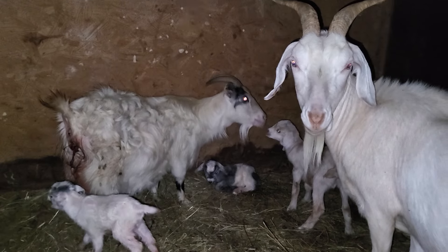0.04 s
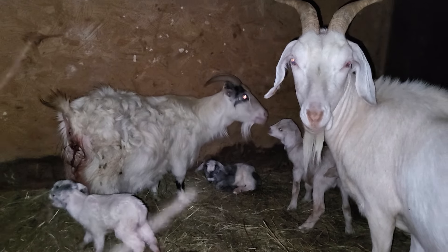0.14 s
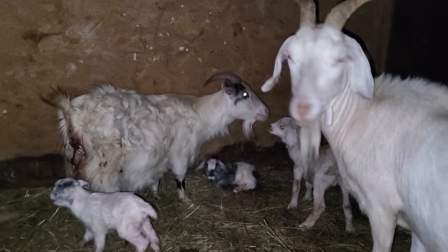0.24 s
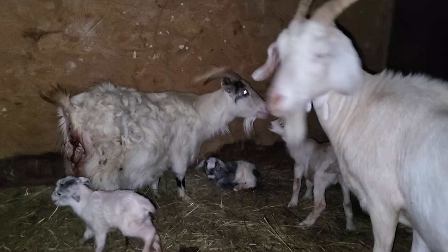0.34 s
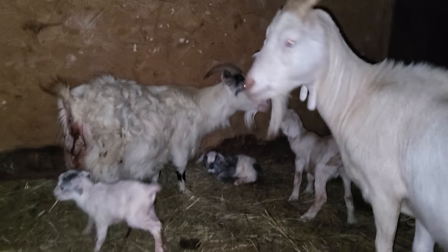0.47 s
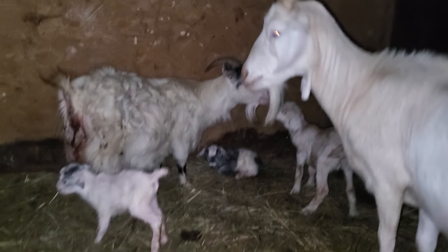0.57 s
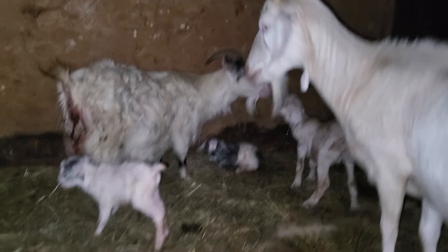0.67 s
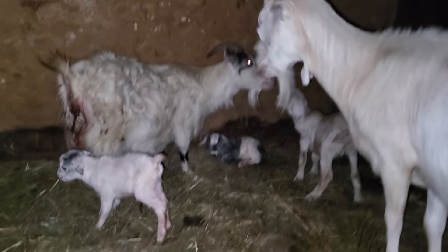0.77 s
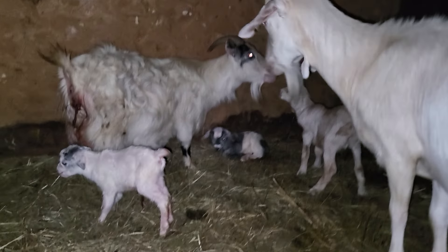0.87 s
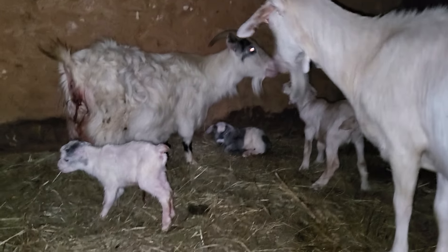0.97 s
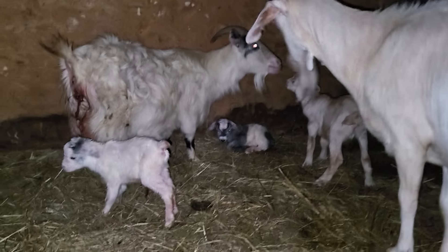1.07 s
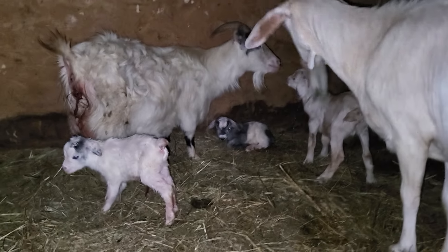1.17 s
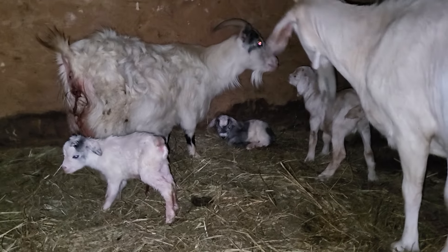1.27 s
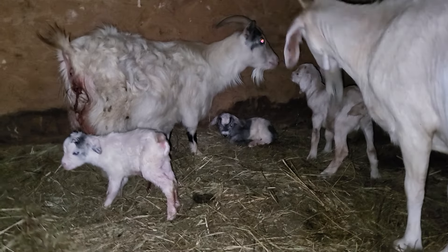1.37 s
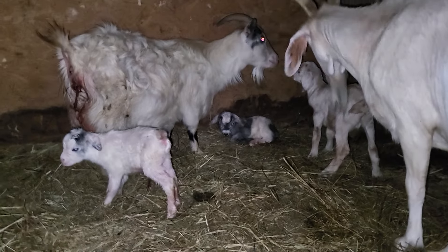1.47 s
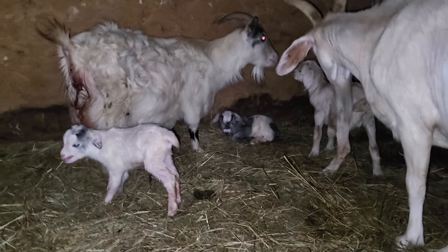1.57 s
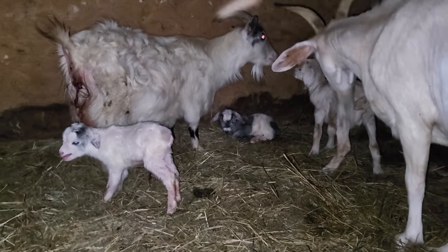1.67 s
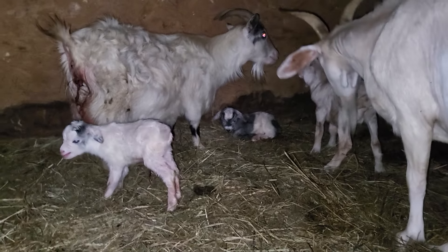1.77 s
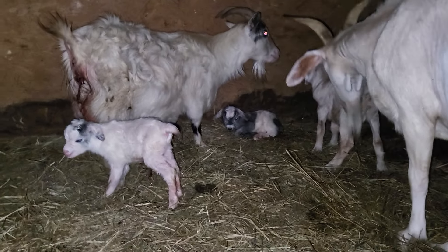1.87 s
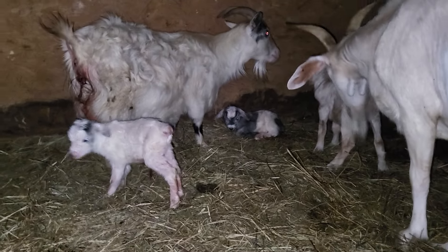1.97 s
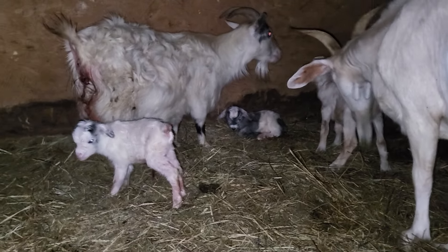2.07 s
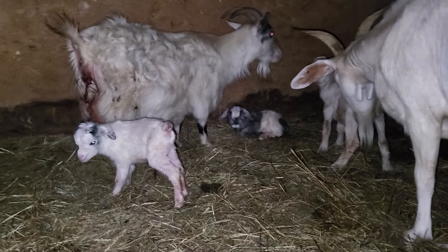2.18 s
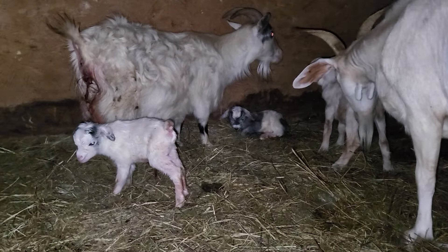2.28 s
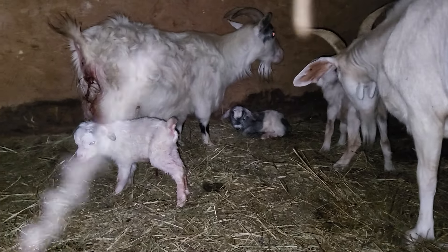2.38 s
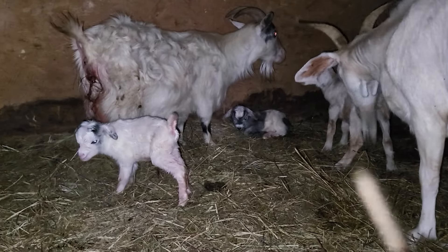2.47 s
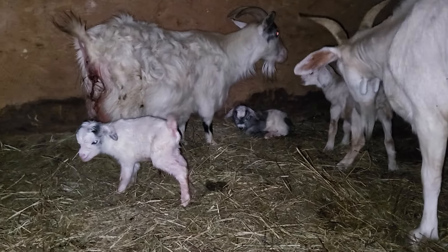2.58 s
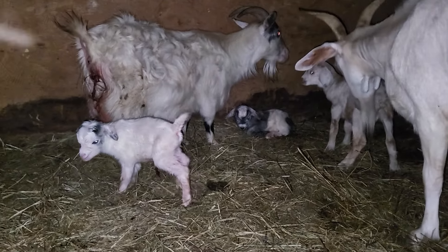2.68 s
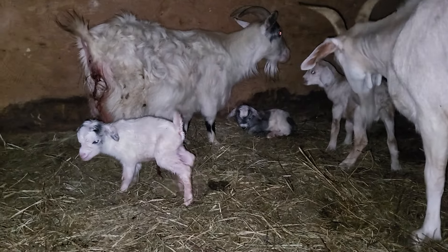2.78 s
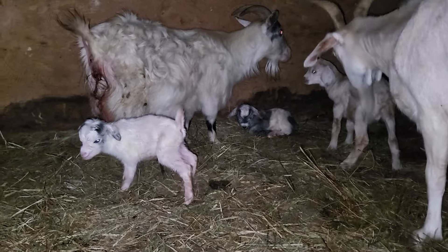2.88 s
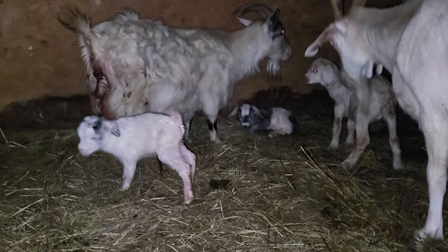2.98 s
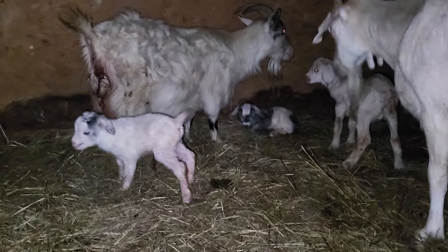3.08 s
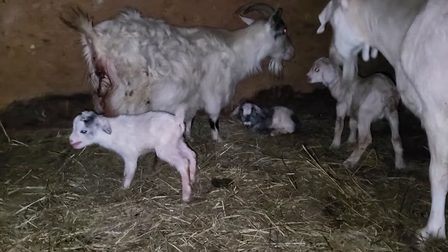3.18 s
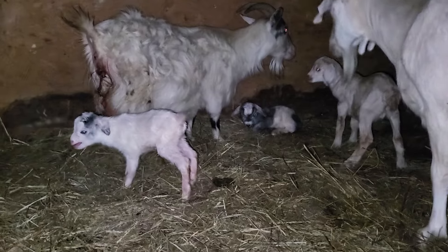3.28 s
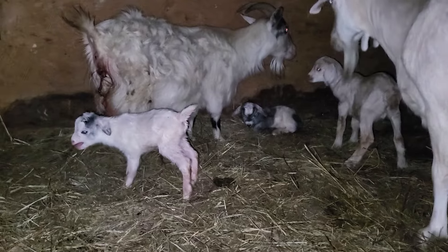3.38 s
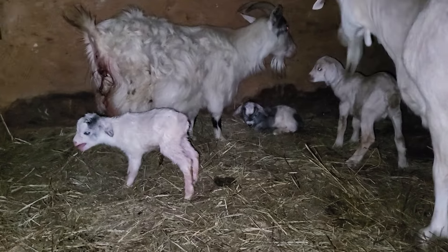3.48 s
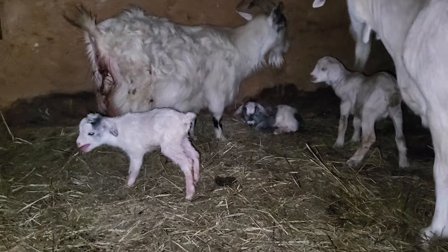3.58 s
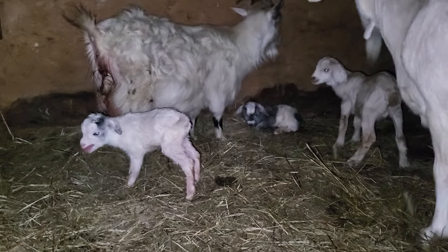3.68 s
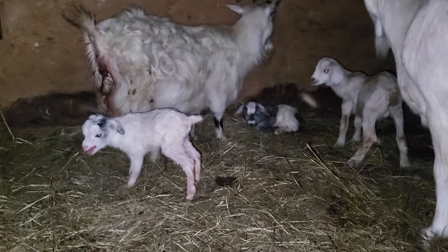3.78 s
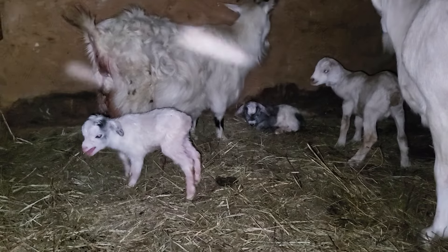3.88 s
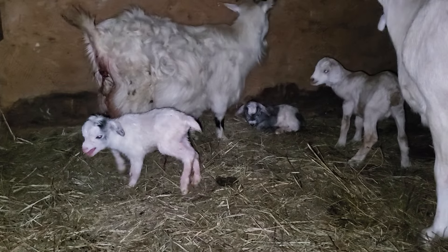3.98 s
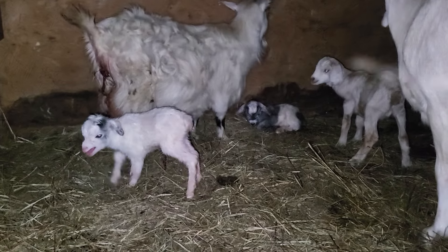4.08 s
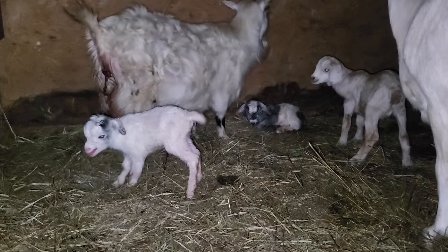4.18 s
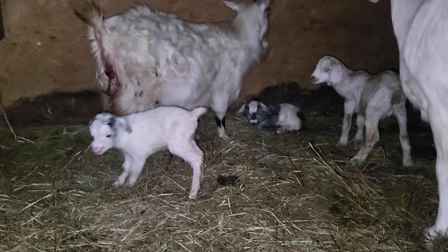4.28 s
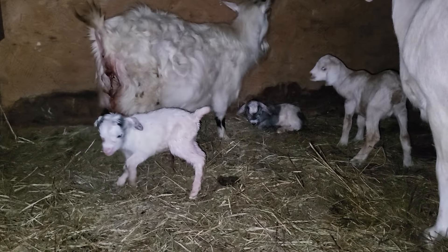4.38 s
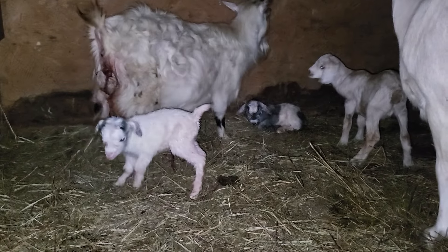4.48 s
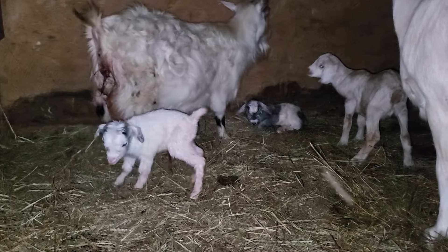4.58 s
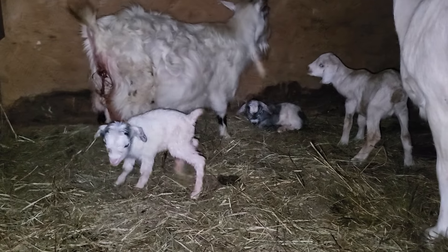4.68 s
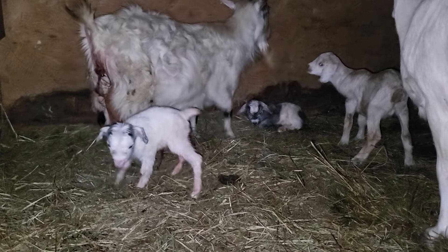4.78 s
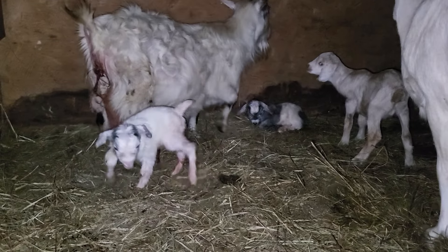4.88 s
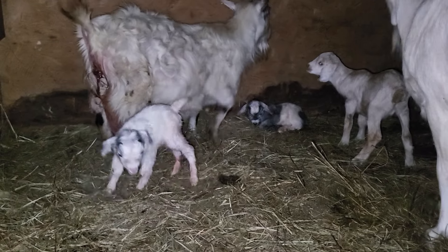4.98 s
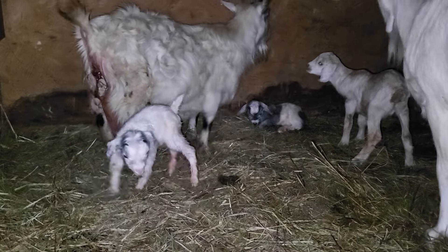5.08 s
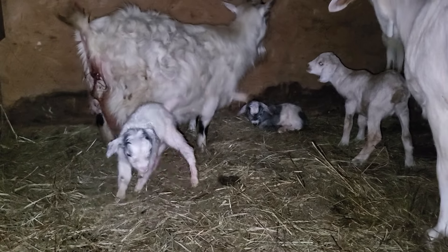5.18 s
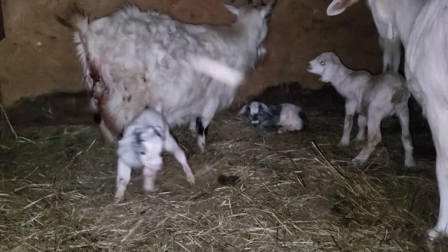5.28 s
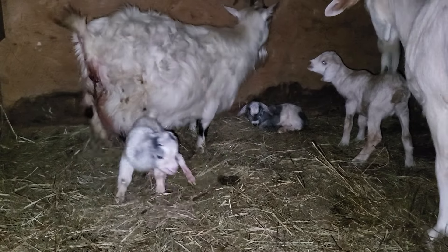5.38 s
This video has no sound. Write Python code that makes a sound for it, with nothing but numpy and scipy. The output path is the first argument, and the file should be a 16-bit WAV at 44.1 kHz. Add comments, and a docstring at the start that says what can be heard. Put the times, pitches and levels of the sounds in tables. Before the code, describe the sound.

Tail end of a kid's bleat, a short broken one, a gruff adult grunt, then a long high wavering bleat over quiet barn rumble and straw rustle.

```python
"""A newborn goat bleats three times in a straw-bedded shed, a few steps from two microphones.
A grown goat grunts once, other kids call faintly, breath whistles in a nose and straw rustles,
over the low rumble and thin hiss of the shed. Voices are summed partials and breath noise through
resonances; air, straw and nose are shaped noise; near reflections and a sparse tail give the room."""
import sys
import numpy as np
from scipy import signal
from scipy.fft import rfft, irfft
from scipy.io import wavfile
from scipy.ndimage import uniform_filter1d, minimum_filter1d

SR = 44100
rng = np.random.default_rng(int(sys.argv[2]) if len(sys.argv) > 2 else 0)


def put_to_file(sound):
    """Save the sound as 16-bit audio at rate SR, in the file named by the first command-line argument."""
    columns = np.atleast_2d(sound).T  # one column per channel
    safe = np.clip(columns, -1, 1)
    whole_steps = np.round(safe * 32767)
    wavfile.write(sys.argv[1], SR, whole_steps.astype(np.int16))


N = 240046
EDGE_HZ = 15950  # upper band limit


def gain_of(db):
    """Amplitude ratio of a level in dB."""
    return 10 ** (np.asarray(db) / 20)


def evened(x, axis=None):
    """Scales to unit RMS."""
    return x / np.sqrt(np.mean(abs(x) ** 2, axis=axis, keepdims=True) + 1e-20)


def smooth_noise(shape, *sizes):
    """Unit-RMS noise after moving averages along the last axis."""
    x = rng.standard_normal(shape)
    for size in sizes:
        x = uniform_filter1d(x, size=size)
    return evened(x)


def read(points, hz):
    """Interpolates a (f/Hz, value) curve on a log frequency axis."""
    f, value = np.transpose(points)
    return np.interp(np.log(hz + 1), np.log(f + 1), value)


def add(mix, s, sound):
    """Adds a sound to the mix at s seconds, cut at the end."""
    part = mix[..., round(s * SR):][..., :sound.shape[-1]]
    part += sound[..., :part.shape[-1]]


def held(x, fall_per_s):
    """Running peak that sinks at a steady rate."""
    fall = np.arange(len(x)) * fall_per_s / SR
    return np.maximum.accumulate(x + fall) - fall


def modes(table, hz):
    """Gain of resonances side by side, rows (f/Hz, width/Hz, level/dB)."""
    return sum(gain_of(db) / (1 + (2 * (hz - f) / width) ** 2) for f, width, db in table)


def shaped(x, gain):
    """Multiplies short-time spectra by gain(hz, s)."""
    hz, s, z = signal.stft(x, SR, nperseg=256, noverlap=192)
    y = signal.istft(z * gain(hz[:, None], s), SR, nperseg=256, noverlap=192)[1]
    return y[..., :x.shape[-1]]


def air():
    """Rumble, hiss, straw rustle and nose breath: noise layers in random short-time spectra."""
    # layer spectra, normalised before use: f/Hz, relative level/dB per Hz
    rumble = [(15, -50), (25, -17), (43, -4.5), (85, -3), (162, -20.5), (283, -27), (406, -45.5),
              (700, -43), (910, -83), (1540, -120)]
    hiss = [(400, -34), (1000, -17.5), (2000, -23.5), (3000, -9.5), (3900, 3.5), (5000, -10), (5800, -23.5),
            (8000, -38.5)]
    straw = [(300, -1), (1500, -7), (2500, 2.5), (5500, 3), (7800, 5.5), (8800, -9), (12000, 3.5),
             (15800, -1)]
    # nostril resonances, normalised before use: f/Hz, width/Hz, relative level/dB
    nostril = [(1830, 290, 1), (1293, 630, -13.5), (2700, 1400, -8)]
    # left-right likeness: f/Hz, correlation/1
    likeness = [(60, 0.99), (240, 0.97), (950, 1), (3770, 0.19), (15000, 0.12)]
    # stereo balance: f/Hz, left minus right/dB
    balance = [(60, -0.5), (150, 1), (380, 0.5), (950, -0.5), (2380, -12), (5980, 2.5), (15000, 6.5)]
    # rumble swell: t/s, level/dB
    swell = [(0.0, -50.5), (0.5, -52.5), (0.97, -54.5), (1.2, -49.5), (1.6, -46), (2.0, -45.5),
             (2.3, -40.5), (2.74, -45.5), (3.32, -42.5), (3.55, -48.5), (4.24, -55), (4.97, -54),
             (5.44, -48)]
    # straw rustle: t/s, level/dB
    rustle = [(0.0, -81.5), (1.4, -75.5), (2.001, -73), (2.2, -80), (2.4, -68.5), (2.62, -75), (2.78, -67),
              (3.05, -72.5), (4.3, -75), (4.451, -70.5), (4.75, -72), (5.1, -67), (5.44, -60.5)]
    # goat nose breaths: start t/s, length/s, level/dB
    breaths = [(0.19, 0.42, -72.5), (.93, 0.25, -81.5), (1.29, 0.72, -60.5), (2.096, 0.25, -69),
               (2.303, 0.31, -66.5), (4.241, 0.13, -76), (4.664, 0.44, -68), (5.02, 0.45, -66.5)]
    hiss_db, hiss_follow, swell_mid_db = -63.5, .85, -49.5
    breath_edge = 0.76  # exponent of the half-sine envelope
    frame, hop = 1024, 256

    frames, hz = N // hop + 5, np.fft.rfftfreq(frame, 1 / SR)
    a, b, c, d, patches = rng.standard_normal((frames, 513, 5)).T
    patches = uniform_filter1d(patches, size=14, axis=0)
    patches = evened(uniform_filter1d(patches, size=10, axis=1))
    t = np.arange(frames) * hop / SR

    rumble_level_db = np.interp(t, *np.transpose(swell))
    slow_swell_db = uniform_filter1d(rumble_level_db, size=80)
    hiss_level_db = hiss_db + hiss_follow * (slow_swell_db - swell_mid_db)
    flicker_db = 1.5 * smooth_noise(frames, 4)
    straw_level_db = np.interp(t, *np.transpose(rustle)) + flicker_db
    puff = sum(gain_of(db) * np.sin(np.pi * np.clip((t - s) / length, 0, 1)) ** breath_edge
               for s, length, db in breaths)
    breath_level_db = 20 * np.log10(puff + 1e-5)

    layers = [(gain_of(read(rumble, hz)), rumble_level_db),
              (gain_of(read(hiss, hz)), hiss_level_db),
              (gain_of(read(straw, hz)) * (hz < EDGE_HZ), straw_level_db),
              (modes(nostril, hz), breath_level_db)]
    power = sum(np.outer(shape / np.linalg.norm(shape), gain_of(db)) ** 2 for shape, db in layers)

    same = np.clip(read(likeness, hz), -1, 1)[:, None]
    left = a + 1j * b
    right = same * left + np.sqrt(1 - same ** 2) * (c + 1j * d)
    lean_db = np.multiply.outer([.5, -.5], read(balance, hz))[..., None]
    z = np.array([left, right]) * np.sqrt(power) * gain_of(1.2 * patches + lean_db)
    overlap = np.sqrt(1.5)  # makes up for overlap-add of independent frames
    return overlap * signal.istft(z, nperseg=frame, noverlap=frame - hop)[1][:, :N]


def snaps():
    """Each stalk gives a short burst of noise, broad around its centre, unlike at the two ports."""
    # straw snaps and rustles: t/s, level/dB (before halving), centre f/Hz, decay/s
    stalks = [(.56, -65, 8000, 0.044), (.815, -62, 6100, .005), (1.03, -63.5, 8000, .05),
              (1.207, -49.5, 2380, .004), (1.272, -57, 6500, 0.013), (2.03, -57, 7540, 0.031),
              (2.225, -47.5, 493, 0.04), (2.31, -53, 6960, .004), (2.4, -50, 4000, .05),
              (2.441, -48, 1800, 0.028), (2.521, -43, 2290, 0.016), (2.689, -53.5, 3000, 0.019),
              (2.882, -52.5, 9070, 0.0045), (3.04, -49, 6940, .018), (4.58, -63.5, 803, 0.019),
              (4.69, -57.5, 6880, 0.017), (4.985, -61, 6500, 0.018), (5.11, -54, 6980, 0.018),
              (5.17, -51, 5980, .025), (5.291, -58, 4900, .016), (5.36, -45.5, 5050, .03)]
    out, t = np.zeros((2, N)), np.arange(6000) / SR
    bursts = rng.standard_normal((len(stalks), 2, len(t)))
    for (s, db, hz, decay), burst in zip(stalks, bursts):
        burst = evened(shaped(burst, lambda f, at: modes([(hz, 1.3 * hz, 0)], f) + 0 * at))
        envelope = np.exp(-t / decay) * np.clip(t / (0.2 * decay), 0, 1)
        add(out, s, gain_of(db) / 2 * burst * envelope)
    return out


def far_call(s, length, first_hz, last_hz, level_db, second_db, third_db):
    """A soft gliding call, dulled by distance to three partials."""
    turns = np.cumsum(np.linspace(first_hz, last_hz, round(length * SR))) / SR
    tone = sum(gain_of(db) * np.sin(2 * np.pi * k * turns)
               for k, db in enumerate([0, second_db, third_db], start=1))
    return s, gain_of(level_db) * tone * signal.windows.tukey(len(turns), .5)


def grunt():
    """Slow uneven pulses and breath resonate in a large chest."""
    # grown goat: t/s, level/dB, pulse rate/Hz, roughness/1
    course = [(1.68, -41.5, 105, .8), (1.75, -32, 125, 0.71), (1.792, -38.5, 150, .8), (1.83, -34, 130, 1),
              (1.875, -29, 149, 0.38), (1.902, -33, 80, 0.67), (1.94, -43.5, 70, 0.33),
              (1.97, -57.5, 75, 0.24)]
    # chest response, normalised after use: f/Hz, relative level/dB
    chest = [(40, 2), (130, -3), (300, -13.5), (450, -20), (900, -23), (1500, -18), (4600, -22),
             (5800, -36), (15000, -56)]
    s, *columns = np.transpose(course)
    t = np.arange(s[0], s[-1], 1 / SR)
    level_db, rate_hz, rough = (np.interp(t, s, c) for c in columns)
    jitter = smooth_noise(len(t), 300)
    turns = np.cumsum(rate_hz * (1 + 0.09 * jitter)) / SR
    # slack folds voice only the low partials
    pulses = sum(np.cos(2 * np.pi * k * turns + 0.61 * k ** 2) for k in range(1, 9))
    puffs = rng.standard_normal(len(t)) * (.5 + np.exp(-(turns % 1) / 0.29))
    drive = (1 - rough) * evened(pulses) + rough * puffs
    f = np.fft.rfftfreq(2 * len(t), 1 / SR)
    body = irfft(rfft(drive, 2 * len(t)) * gain_of(read(chest, f)))[:len(t)]
    return s[0], evened(body) * gain_of(level_db)


def bleat(rows):
    """Partials of the vocal folds and puffs of breath pass the nose, the mouth and the throat."""
    # upper throat resonances: f/Hz, width/Hz, level/dB re effort
    upper_throat = [(3630, 3100, -16.5), (6746, 200, -25), (7860, 980, -17), (10675, 1100, -32.5),
                    (14500, 750, -28.5)]
    mouth_width_hz, throat_width_hz, lips_hz = 490, 1690, 1160
    # the throat resonance sinks when pitch falls under slack_hz
    throat_top_hz, throat_hz_per_hz, slack_hz = 5217, 7.0, 600
    shut_db, open_s = -43, 0.059  # extra nose hum at the start, mouth shut
    # the nose hum follows effort, up to a ceiling that sinks as the bleat goes on
    nose_db, nose_top_db, nose_shut_db_per_s = -18.5, -42.5, 20.5
    # the voice cracks where effort drops under its recent peak, and heals slowly
    clear, crack_scale, crack_db, forget_db_per_s, heal_s = .003, .3, 19, 55, .027
    tire_s, tired_rough, tired_tremor, tremor_hz = .8, .005, .004, 24.17
    # starts and sagging ends are hoarse
    onset_rough, onset_s, slack_rough_per_hz, grit_depth = .3, .018, .0012, .12
    under_way_s = .95  # age of the first bleat when the scene opens

    s, pitch, *columns = np.transpose(rows)
    t = np.arange(s[0], s[-1], 1 / SR)
    count = len(t)
    pitch_hz = np.interp(t, s, pitch)
    born = s[0] - under_way_s * (s[0] == 0)

    push_db = np.interp(t, s, columns[0])
    drop = (held(push_db, forget_db_per_s) - push_db) / crack_db
    crack = np.exp(held(np.log(crack_scale * drop ** 2 + 1e-9), 1 / heal_s))
    crack = np.minimum(crack, .4)
    sag_hz = np.maximum(pitch.mean() - 20 - pitch_hz, 0)
    crack = crack + onset_rough * np.exp(-(t - born) / onset_s) + slack_rough_per_hz * sag_hz
    tired = np.clip(10 * (t - born - tire_s), 0, 1)
    rough = clear + crack + tired_rough * tired
    tremor = np.minimum(.001 + crack / 10, .01) + tired_tremor * tired

    wobble = (0.0035 + 0.033 * rough) * smooth_noise(count, 500, 300)
    tremble = tremor * np.sin(2 * np.pi * tremor_hz * (t + s[0]))
    hz = uniform_filter1d(pitch_hz, size=400) * (1 + wobble + tremble)
    grit = smooth_noise(count, 100)  # cycle-to-cycle unevenness
    turns = np.cumsum(hz * (1 + grit_depth * rough * grit)) / SR

    def tract(f, at):
        """Gain of nose, mouth and throat at frequency f and time at."""
        effort_db, mouth_db, mouth_hz = (np.interp(at, s, c) for c in columns)
        slack = np.maximum(slack_hz - np.interp(at, s, pitch), 0)
        throat_hz = throat_top_hz - throat_hz_per_hz * slack
        age = at - born
        shut = gain_of(shut_db) * np.exp(-(age / open_s) ** 4)
        hum_db = np.minimum(effort_db + nose_db, nose_top_db - nose_shut_db_per_s * age)
        nose = (shut + gain_of(hum_db)) * modes([(625.3, 750, 0.0047)], f)
        mouth = gain_of(mouth_db) * modes([(mouth_hz, mouth_width_hz, 0)], f)
        throat_modes = upper_throat + [(throat_hz, throat_width_hz, -6)]
        throat = gain_of(effort_db) * modes(throat_modes, f)
        return nose + (mouth + throat) / (1 + (lips_hz / (f + 1)) ** 4)  # small lips radiate bass poorly

    k = np.arange(1, 28)[:, None]
    # each partial wavers alone, and differently at each port as the head sways
    # shimmer rows: common level, level at each port (2), phase at each port (2)
    shimmer = smooth_noise((5, len(k), count // 16 + 1), 150, 80)
    shimmer = shimmer.repeat(16, axis=-1)[..., :count]
    shimmer = uniform_filter1d(shimmer, size=32)
    flicker = smooth_noise((len(k), count), 400)
    flicker_db = (.07 + 3 * rough) * k * flicker / 2
    waver = gain_of(1.5 * shimmer[0] + 2.5 * shimmer[1:3] + flicker_db)
    waver *= (1 - rough) ** (k / 2)  # uneven cycles blur the high partials first
    phase = 2 * np.pi * k * turns + 0.41 * k ** 2 + 0.57 * shimmer[3:]
    folds = (tract(k * hz, t) * waver * np.cos(phase)).sum(1)

    puffs = (0.69 + np.exp(-(turns % 1) / 0.19)) * rng.standard_normal(count)
    # turbulence is brighter than the folds
    breath = shaped(evened(puffs), lambda f, at: tract(f, at + s[0]) * (1 + f / 1400.0))
    fade_in = np.clip((t - s[0]) / .035 + (s[0] == 0), 0, 1)  # none if already under way
    fade_out = np.clip((s[-1] - t) / .03, 0, 1)
    return (np.sqrt(2) * (1 - rough) * folds + 4.5 * rough * breath) * fade_out * fade_in


def paths(x, lean, lead):
    """Direct sound and near reflections reach each port with its own colour and delay."""
    # floor and wall reflections: delay/s, gain/1
    echoes = [(.0008, 0.1), (.0026, 0.038), (.0047, 0.11)]
    size = x.shape[1] + 2048
    f = np.fft.rfftfreq(size, 1 / SR)
    early = 1 + sum(g * np.exp(-2j * np.pi * f * s) for s, g in echoes)
    half_lean_db = read(lean, f) / 2
    left = gain_of(half_lean_db)
    right = gain_of(-half_lean_db) * np.exp(-1j * np.interp(f, *np.transpose(lead)))
    return irfft(rfft(x, size) * early * np.array([left, right]), size)[:, :size - 1024]


def shed(x):
    """Sparse taps of random sign, each band dying at its own speed."""
    # shed decay: f/Hz, t60/s
    decay = [(500, 0.12), (2300, 0.54), (5000, 0.37), (12000, 0.03)]
    taps = np.zeros((2, SR // 2))
    at = np.arange(400, SR // 2 - 20, 20)
    at = at + rng.integers(0, 20, (2, len(at)))
    np.put_along_axis(taps, at, rng.choice([-1., 1.], at.shape), 1)
    tail = shaped(taps, lambda f, s: gain_of(-60 * s / read(decay, f)))
    return signal.fftconvolve(x[None], tail / np.linalg.norm(tail[0]), axes=1)[:, :N]


def scene():
    """Kid with near reflections and shed tail, herd, air and straw at two ports."""
    # one table a bleat: t/s, pitch f/Hz, effort/dB, mouth resonance level/dB, mouth resonance f/Hz
    bleats = [
        [(0.0, 650, -21.5, -20.5, 2400), (0.046, 626, -30, -21.5, 2500), (0.092, 605, -27, -21.5, 2350),
         (0.12, 576.5, -28.5, -31.5, 2330), (0.145, 554, -31.5, -22.5, 2350), (0.162, 500.4, -37, -23.5, 2250),
         (0.2, 506, -65, -52.5, 2130)],
        [(1.56, 552, -64, -65, 2110), (1.602, 580, -35, -62, 1950), (1.646, 590.4, -19.5, -25.5, 1780),
         (1.675, 597, -33.5, -37.5, 1830), (1.698, 527, -39, -37.5, 1880), (1.718, 576, -31.5, -34.5, 1890),
         (1.75, 589, -21.5, -25, 1890), (1.78, 562, -35, -36, 1870), (1.85, 537, -55, -44, 1820)],
        [(3.09, 516, -56, -56.5, 2400), (3.126, 601, -46, -42, 1950), (3.15, 608, -35.5, -31.5, 1880),
         (3.19, 606, -25, -18.5, 1830), (3.238, 609.4, -37, -33, 1900), (3.25, 643, -39, -29, 1940),
         (3.282, 612, -18, -16, 1924), (3.316, 626.4, -33, -30.5, 1980), (3.342, 603, -45.5, -39, 2050),
         (3.4, 643, -16, -17.5, 1972), (3.438, 641, -20.5, -21.5, 1908), (3.476, 673.5, -14, -11.5, 2070),
         (3.52, 665.7, -15.5, -23.5, 2050), (3.57, 690, -16.5, -17, 2060), (3.644, 688, -12.5, -11.5, 2080),
         (3.806, 693.8, -13.5, -17, 2110), (3.845, 668, -16.5, -15.5, 2070), (3.895, 628.8, -23.5, -25.5, 2350),
         (3.94, 621, -22, -22, 2390), (4.104, 605.3, -24.5, -21, 2250), (4.15, 517, -36, -22, 2185),
         (4.19, 509, -79.5, -47, 2070)],
    ]
    # the kid turns its head, so each bleat meets the two ports differently
    # one table a bleat: f/Hz, left minus right/dB
    port_lean = [
        [(60, 5), (130, -5.5), (290, -22.5), (640, -4.5), (1410, 2.5), (3100, -9.5), (6820, 8), (15000, 0.5)],
        [(60, -4.5), (130, 4), (290, -5.5), (640, 4), (1410, -4), (3100, -10), (6820, 5), (15000, 21)],
        [(60, 0), (110, 1), (200, -1), (380, 11), (700, 2.5), (1290, -4), (2380, -4.5), (4400, -7), (8120, 8),
         (15000, -4)],
    ]
    # one table a bleat: f/Hz, left lead/rad
    port_lead = [
        [(0, 0.5), (1890, -0.5), (4820, 16), (5430, 5), (13000, 1), (15600, -9)],
        [(0, 1), (3360, 1.8), (6550, 9.5), (9820, 16.5), (12100, 34), (15600, 70)],
        [(0, 0.5), (1810, -2), (2580, 4), (3960, 3.5), (9650, 16), (11800, 13), (13900, 18), (15600, 26.5)],
    ]
    # far kids: t/s, length/s, first f/Hz, last f/Hz, level/dB, 2nd and 3rd partial/dB re first
    far = [(0.697, .09, 633, 500, -71.5, -2, 0), (0.866, .08, 545, 500, -83, 3, 9),
           (1.028, 0.058, 465, 480, -87.5, 3.5, 12), (5.1, 0.11, 663, 650, -84.5, 22, 1),
           (5.278, 0.19, 658, 660, -78, 14, -11), (5.307, 0.054, 600, 562, -64, 0, -7)]
    shed_db = -33

    kid, near, herd = np.zeros(N), np.zeros((2, N)), np.zeros(N)
    for rows, lean, lead in zip(bleats, port_lean, port_lead):
        voice = bleat(rows)
        add(kid, rows[0][0], voice[0])
        add(near, rows[0][0], paths(voice, lean, lead))
    add(herd, *grunt())
    for row in far:
        add(herd, *far_call(*row))
    # the herd is nearer the left port
    herd = np.array([gain_of(0.15) * herd, gain_of(-0.8) * np.roll(herd, 10)])
    return near + gain_of(shed_db) * shed(kid) + herd + air() + snaps()


def record(dry):
    """The microphone drops the deepest bass, a limiter holds the loudest crests; then the band limit."""
    highpass = signal.butter(4, Wn=42., btype="high", fs=SR, output="sos")
    thin = signal.sosfilt(highpass, dry)
    crest = -minimum_filter1d(-abs(thin).max(0), size=801)
    limit = np.minimum(1, .9 / (crest + 1e-9))
    tamed = thin * uniform_filter1d(limit, size=401)
    lowpass = signal.firwin(511, EDGE_HZ, window=("kaiser", 9), fs=SR)
    return signal.oaconvolve(tamed, lowpass[None], "same")


dry = scene()
out = record(dry)
put_to_file(out)
```